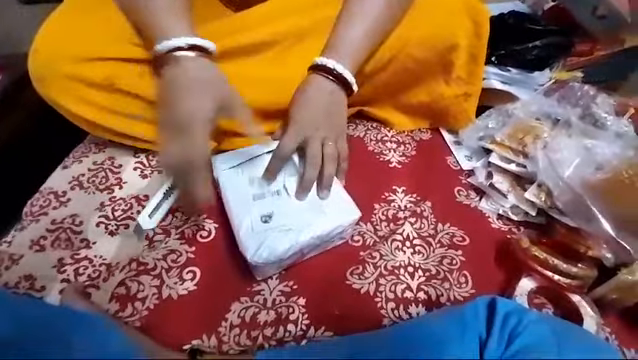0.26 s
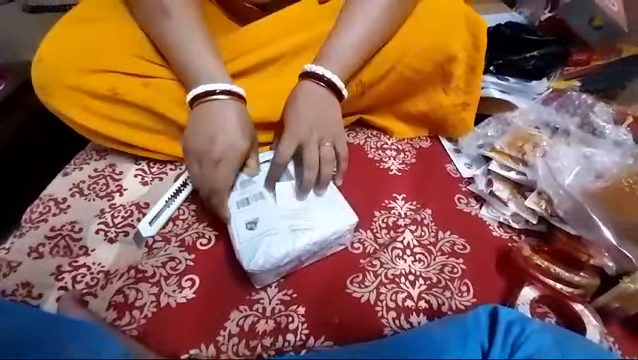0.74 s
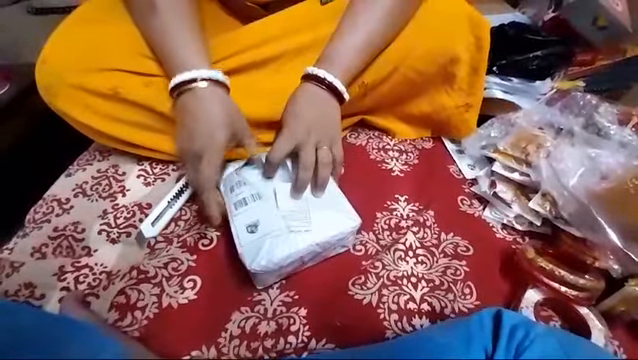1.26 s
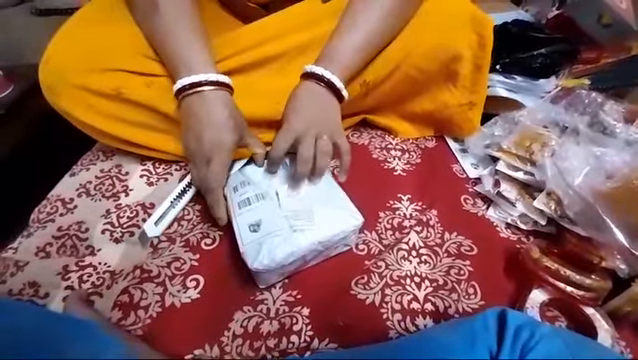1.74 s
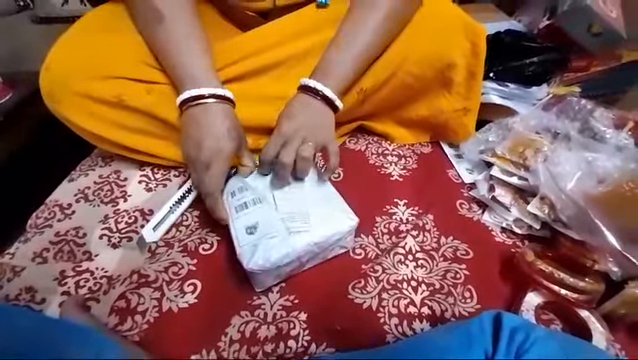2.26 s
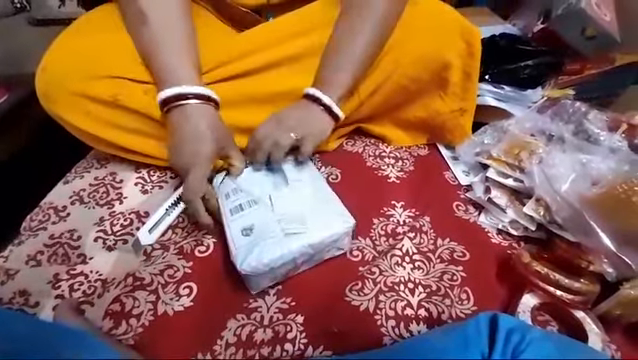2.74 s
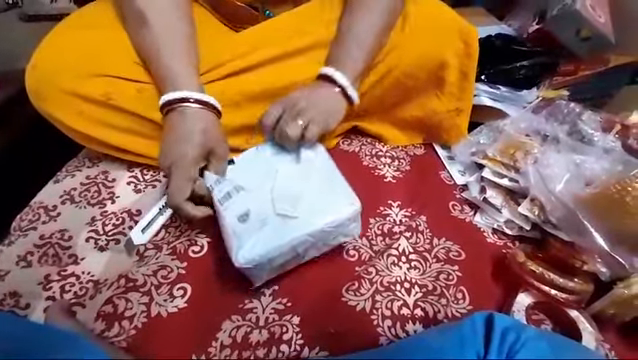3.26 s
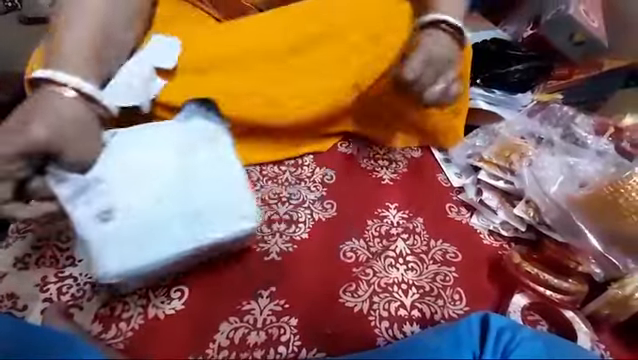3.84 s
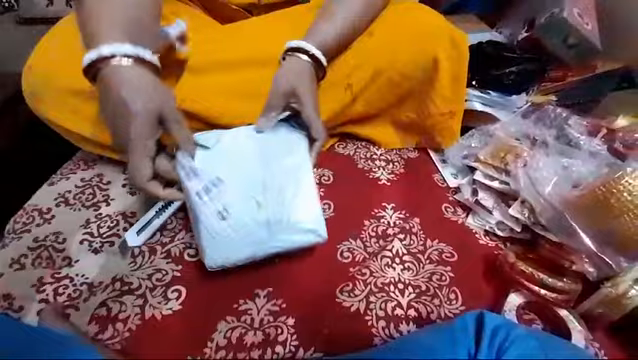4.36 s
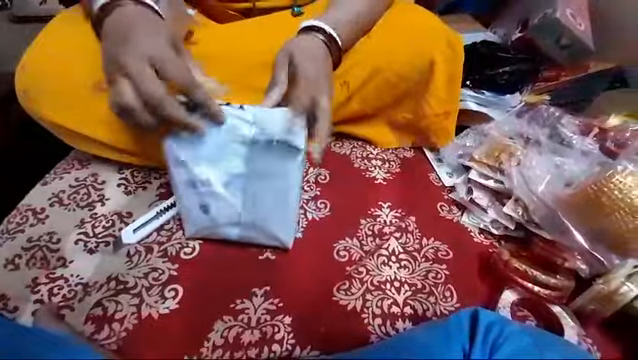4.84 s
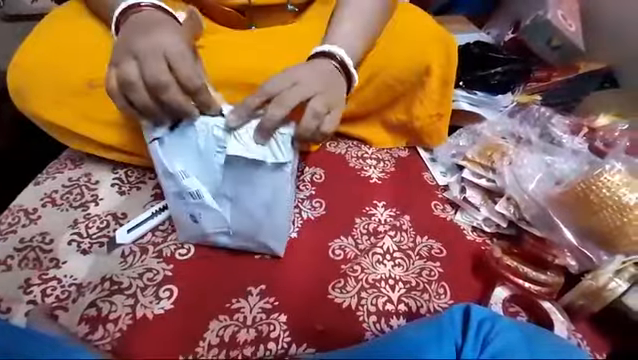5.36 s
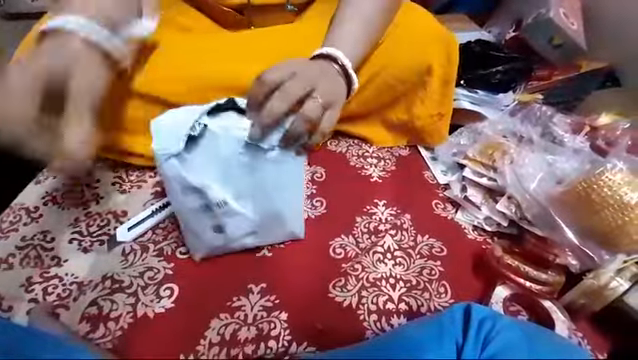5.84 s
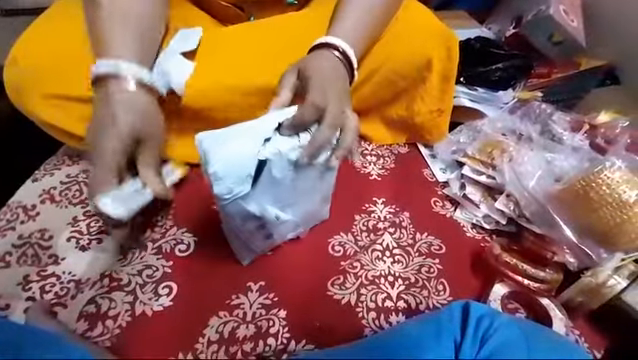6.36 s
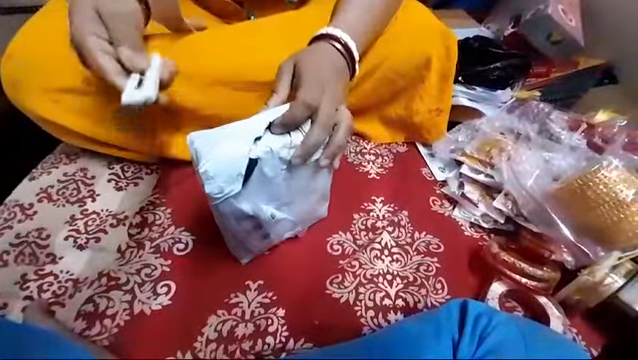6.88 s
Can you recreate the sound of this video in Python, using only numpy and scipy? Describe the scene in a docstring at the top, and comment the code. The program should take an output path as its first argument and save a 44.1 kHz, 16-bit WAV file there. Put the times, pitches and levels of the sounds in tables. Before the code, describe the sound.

Hands crinkle, snap and tear open a plastic mailer around a small box, while an engine throbs low outside the room.

```python
"""An engine outside throbs in a room with faint noise: beating orders of its cycle through broad resonances.
Hands then tear open and crumple a plastic mailer around a cardboard box, heard in stereo.
The film rustles, snaps and squeaks: noise puffs and ticks ring its patches, all coloured by one sheet.
Tugs boom in the box as short, sagging sines; faint tones are narrow noise; the seam rips in dense slips."""
import sys
import numpy as np
from scipy import signal
from scipy.fft import rfft, irfft
from scipy.io import wavfile
from scipy.ndimage import uniform_filter1d

SR = 44100
rng = np.random.default_rng(int(sys.argv[2]) if len(sys.argv) > 2 else 0)


def digitize_waveform(pressure):
    """Quantize a signal to 16-bit integers and store it at the path in sys.argv[1].

    Rows of a 2-D input are taken as channels; values are limited to [-1, 1].
    """
    field = np.atleast_2d(pressure).T
    bounded = np.clip(field, -1, 1)
    quanta = np.round(bounded * 32767).astype(np.int16)
    wavfile.write(sys.argv[1], SR, quanta)


N = 313551


def amp(db):
    """Decibels to gain."""
    return 10 ** (np.asarray(db) / 20)


def evened(x):
    """Scales to rms 1."""
    return x / np.sqrt(np.mean(x ** 2) + 1e-20)


def read(points, hz):
    """Reads a table over log frequency."""
    f, value = np.transpose(points)
    return np.interp(np.log(hz + 1), np.log(f + 1), value)


def curves(rows):
    """Columns of a time table, one value a sample."""
    s, *columns = np.transpose(rows)
    t = np.arange(N) / SR
    return [np.interp(t, s, column) for column in columns]


def colour(x, points):
    """Causal minimum-phase filter of unit energy with the given spectrum shape."""
    shape_db = np.maximum(read(points, np.fft.rfftfreq(4096, 1 / SR)), -70)
    half = shape_db * np.log(10) / 20
    log_gain = np.concatenate([half, half[-2:0:-1]])
    taps = np.fft.ifft(np.exp(np.conj(signal.hilbert(log_gain)))).real[:2048]
    taps /= np.linalg.norm(taps)
    return signal.oaconvolve(x, taps[None], axes=1)[:, :N]


def resonate(x, hz, width_hz):
    """Shifts the curve hz down to zero, smooths, and shifts back: a resonance of gain 1."""
    turn = np.exp(2j * np.pi * np.cumsum(hz * np.ones(len(x))) / SR)
    r = np.exp(-np.pi * width_hz / SR)
    smooth = signal.lfilter([1 - r], [1, -r], x / turn)
    return 2 * (turn * smooth).real


def blend(left, other, same):
    """Left and right of a given likeness, from two unrelated noises."""
    same = np.clip(same, 0, 1)
    return np.array([left, same * left + np.sqrt(1 - same ** 2) * other])


def pair(same):
    """Two channels of white noise with a given likeness."""
    left, other = rng.standard_normal((2, N))
    return blend(left, other, same)


def dying(clicks, t60_s):
    """Each click becomes an exponentially dying envelope."""
    return signal.lfilter([1], [1, -10 ** (-3 / (t60_s * SR))], clicks)


def add(mix, s, sound):
    """Mixes a sound in at a time."""
    part = mix[..., round(s * SR):][..., :sound.shape[-1]]
    part += sound[..., :part.shape[-1]]


# engine speed: (time [s], cycle rate [Hz])
CYCLE_RATE = [(0, 10.3), (1.5, 11.2), (2.3, 9.35), (4.5, 9.1), (5.7, 11), (7.11, 9.15)]
# centre of the boom resonance: (time [s], frequency [Hz])
BOOM_CENTRE = [(0, 122.6), (3.7, 122.6), (4.1, 107.9), (4.7, 112), (5.2, 118.1), (5.9, 124.2),
               (7.11, 117.5)]
# engine in the room: (time [s], boom level [dB], rumble level [dB], upper noise level [dB])
ENGINE_LEVELS = [(0.0, -33.5, -44, -51.5), (0.38, -32.5, -44, -47), (1.05, -36.5, -37.5, -38),
                 (1.35, -35.5, -37, -49.5), (1.62, -41.5, -50, -58.5), (2.15, -32, -44, -42),
                 (2.65, -38.5, -40, -54), (3.62, -31, -45.5, -46), (3.88, -37.5, -45.5, -57),
                 (4.67, -34.5, -46, -58), (5.17, -30.5, -39, -43), (5.41, -34, -34.5, -44),
                 (5.95, -38.5, -44, -55), (6.73, -40, -41.5, -55), (7.11, -31.5, -47, -53)]
# boom resonance: (frequency over centre [ratio], relative level [dB])
BOOM_SHAPE = [(.75, -49), (.86, -0.5), (.93, -2.5), (1.0, 9.5), (1.08, 1), (1.22, -67)]
# low-order resonances: (frequency [Hz], relative level [dB])
RUMBLE_SHAPE = [(30, -57), (46, 1.5), (58, -2), (76, 0.5), (88, -29), (110, -12)]


def hum():
    """The orders of a slow engine cycle pass broad resonances; neighbours beat at the cycle rate."""
    (cycle_hz,), (centre_hz,) = curves(CYCLE_RATE), curves(BOOM_CENTRE)
    boom_db, rumble_db, upper_db = curves(ENGINE_LEVELS)
    phase = 2 * np.pi * np.cumsum(cycle_hz) / SR
    boom, rumble, power = np.zeros((3, N))
    for k in range(3, 17):
        order = np.sqrt(2) * np.sin(k * phase + 2 * np.pi * rng.random())
        drift = uniform_filter1d(uniform_filter1d(rng.standard_normal(N), 9000), 9000)
        uneven = amp(3.1 * evened(drift))
        gain = uneven * amp(np.interp(k * cycle_hz / centre_hz, *np.transpose(BOOM_SHAPE)))
        boom += gain * order
        power += gain ** 2
        rumble += uneven * amp(read(RUMBLE_SHAPE, k * cycle_hz)) * order
    boom_noise, upper_noise, side_noise = rng.standard_normal((3, N))
    rough = evened(resonate(resonate(boom_noise, centre_hz, 9.8), centre_hz, 12.7))
    boom = boom / np.sqrt(power) + amp(-6.0) * rough
    upper = evened(resonate(resonate(upper_noise, 221.0, 44), 166, 510))
    mono = amp(boom_db) * boom + amp(rumble_db) * evened(rumble) + amp(upper_db) * upper
    # opposite sign left and right
    apart = amp(boom_db - 33.0) * evened(resonate(resonate(side_noise, 91, 70), 91, 70))
    return mono * amp([[-.4], [.4]]) + np.outer([1, -1], apart)


# room noise spectrum: (frequency [Hz], relative density [dB per Hz])
AIR_SPECTRUM = [(88, -13), (150, -2.5), (222, -9), (309, -10), (578, -14.5), (649, -11.5), (979, -22),
                (3770, -31), (5150, -36), (16000, -38.5)]
# room noise width: (frequency [Hz], left-right likeness [0..1])
AIR_LIKENESS = [(130, 0), (290, 1), (640, 0.24), (1400, 0)]
AIR_DB = -52  # rms


def air():
    """Room noise: most alike left and right in the low range, unrelated in the treble."""
    left, other = rfft(rng.standard_normal((2, N)))
    hz = np.fft.rfftfreq(N, 1 / SR)
    both = blend(left, other, read(AIR_LIKENESS, hz)) * amp(read(AIR_SPECTRUM, hz))
    return amp(AIR_DB) * evened(irfft(both, N))


# body of the folded film: (frequency [Hz], relative density [dB per Hz])
FILM_BODY = [(410, 7.5), (700, -4), (947, -3), (1160, -4.5), (1400, -2.5), (2100, 1.5), (3500, -4.5),
             (4400, -7.5), (8200, -9), (12100, -120)]
# small creases: (frequency [Hz], relative density [dB per Hz])
FILM_FIZZ = [(2060, -11), (3500, -10), (5600, -3), (8150, 3.5), (9200, -3), (12300, 1.5), (15100, -1.5),
             (16000, -9.5)]


def film():
    """Rustle, creases, snaps and squeaks all sound through the same film."""
    work_db = handling_db() + slides_db()
    loud, wake = snaps()
    body, fizz = rustle(work_db, wake) + creases(work_db) + loud
    body += squeaks()
    return colour(body, FILM_BODY) + colour(fizz, FILM_FIZZ)


# how hard the hands work the film: (time [s], drive level [dB])
HANDLING = [(0.0, -49), (0.38, -52.5), (0.79, -43), (1.23, -50.5), (1.56, -56.5), (1.78, -70), (2.3, -43.5),
            (2.39, -48.5), (3.55, -39), (3.64, -36.5), (3.88, -55.5), (3.97, -69), (4.06, -59.5),
            (4.34, -52), (4.77, -52), (5.01, -43.5), (5.2, -44.5), (5.29, -52.5), (5.64, -43.5),
            (6.38, -65), (6.5, -66.5), (7.11, -65.5)]


def handling_db():
    """Drive of the rustle and creases by the hands."""
    return curves(HANDLING)[0]


TREBLE_DB = -0.5  # treble offset of rustle and creases
WAKE_T60_S = 0.08


def rustle(work_db, wake):
    """Sliding hiss and ticking patches follow the hands; each snap leaves them rustling."""
    rustle_db = 20 * np.log10(amp(work_db) + dying(wake, WAKE_T60_S))
    body_flutter_db, fizz_flutter_db = 3.5 * evened(uniform_filter1d(rng.standard_normal((2, N)), 500))
    body = amp(rustle_db - 7 + body_flutter_db) * pair(0.56)
    body += amp(rustle_db - 6.5) * patches()
    fizz_db = (rustle_db + work_db) / 2 + TREBLE_DB - 5.0 + fizz_flutter_db
    return np.array([body, amp(fizz_db) * pair(0.045)])


def patches():
    """Patches of film of different pitch each tick by fits and starts; every tick rings its patch."""
    out = np.zeros((2, N))
    for hz in np.geomspace(1100, 3400, num=8):
        drift = uniform_filter1d(uniform_filter1d(rng.standard_normal(N), 500), 500)
        fits = amp(5 * evened(drift))
        sizes = amp(3.5 * np.minimum(rng.exponential(1, N), 4))
        ticks = fits * sizes * (rng.random(N) < 260 / SR)  # mean 260 ticks a second
        out += np.array([resonate(ticks * side, hz, 0.19 * hz) for side in pair(0.45)])
    return evened(out)


def creases(work_db):
    """One fold sets off its neighbours: small buckles in bunches, many small and few large."""
    sheet = np.zeros((2, 2, N))  # body and fizz, each left and right
    bunches = N * rng.random(500)
    for when, later, size, dull, side, pitch, length, lag in rng.random((1100, 8)):
        start = bunches[int(when * len(bunches))]
        at = int(min(start + .03 * SR * later, N - 1))
        db = work_db[at] + 13 - 4 * np.log(size + 0.04)
        treble_db, pan_db = TREBLE_DB - 28 * dull, 8 * (side - .5)
        hz, length_s = 1100 * 3.2 ** pitch, 0.00015 + 0.0015 * length ** 2
        add(sheet, at / SR, snap(db, treble_db, pan_db, hz, length_s, int(18 * lag - 9), 0))
    return sheet


RING = 0.33  # ring width over patch pitch


def snap(db, treble_db, pan_db, hz, length_s, lag, crack):
    """A patch buckles: a short puff rings it and the creases fizz; lag [samples] delays the right side."""
    t = np.arange(900) / SR
    flutter = amp(-18 - 60 * t / 0.03) * (1 - np.exp(-t / 0.00061))
    lengths_s = (length_s, 1.13 * length_s)  # body, fizz
    shape = np.array([(t / x) * np.exp(1 - t / x) + flutter for x in lengths_s])[:, None]
    near, far, hiss, other = rng.standard_normal((4, len(t)))
    near[10] += crack  # one hard click within the puff
    body = [near, 0.66 * near + 0.36 * far]
    fizz = [hiss, 0.5 * near + other]
    puffs = shape * np.array([body, fizz])
    direct = min(amp(treble_db + 4), .6)
    puffs[0] = [direct * p + resonate(resonate(p, hz, RING * hz), hz, hz) for p in puffs[0]]
    puffs /= np.linalg.norm(puffs, axis=2, keepdims=True)  # unit energy per band and side
    puffs[1] *= amp(treble_db + 12.0)
    left = np.pad(puffs[:, 0], [(0, 0), (10, 10)])
    right = np.pad(puffs[:, 1], [(0, 0), (10 + lag, 10 - lag)])
    return np.stack([left, right], 1) * amp(db + pan_db * np.array([[.5], [-.5]]))


# loud snaps: (time [s], level [dB], treble share [dB], patch pitch [Hz], left minus right [dB])
SNAPS = [(0.1255, -26, -13.5, 2030, 0.5), (0.4016, -18.5, -50, 1610, 11), (0.6043, -26.5, -4.5, 2360, -3.5),
         (0.8281, -30, 0.5, 1490, -3.5), (0.8998, -24.5, -14, 1750, -1.5), (0.982, -23, -7, 2430, -4.5),
         (1.044, -22, -34, 1170, 0), (1.1629, -17, -10.5, 2310, -3), (1.2487, -20.5, -14, 1820, -3),
         (1.2965, -27, -5, 1810, 0), (1.5217, -35, -5, 2150, -4), (1.5439, -32.5, 6, 1850, -2.5),
         (1.573, -22.5, -7, 1450, -2.5), (1.7657, -33.5, -3, 1860, -5), (1.9208, -34.5, -4, 2150, -2.5),
         (1.944, -33, -7, 2150, -1.5), (1.9603, -22, -13, 2370, -3), (1.9943, -23.5, -18, 1300, -0.5),
         (2.03, -26, -20, 1750, -0.5), (2.097, -20, -20.5, 1260, -2.5), (2.188, -21.5, -13, 1900, -2),
         (2.208, -36, 1, 1460, 0), (2.2846, -27.5, 7, 2250, -1.5), (2.391, -23, -8, 1750, 1.5),
         (2.4057, -24, -1, 2470, -1), (2.4334, -6, -15.5, 2300, 1), (2.4907, -18, -7, 1800, -2.5),
         (2.5914, -25, -30, 1890, 0), (2.78, -23, -21, 1700, 0), (2.882, -11.5, -5, 1940, -1),
         (2.9155, -14, -3.5, 1800, 1), (2.916, -24, -22, 1470, 0), (3.045, -44, -11, 2000, 3),
         (3.055, -12, -11.5, 1640, 0.5), (3.0762, -29, 3, 1960, 0.5), (3.1485, -8.5, -8.5, 1990, -1.5),
         (3.2238, -15.5, -14, 1630, -2), (3.2274, -18.5, -9, 2020, -2), (3.252, -10, -17, 1730, -2),
         (3.2904, -9.5, -6.5, 2230, 0.5), (3.338, -14.5, -31, 1560, -0.5), (3.37, -24, 1, 2400, -4),
         (3.3728, -14, -23, 2130, -3), (3.4008, -10.5, -11, 2210, 1), (3.537, -13.5, -9.5, 1910, -1.5),
         (3.5867, -11.5, -14, 1050, 2.5), (3.6156, -4, -19.5, 1160, 0.5), (3.661, -16, -13, 3520, 9),
         (3.6658, -32.5, 13.5, 2280, 0.5), (3.7056, -3.5, -17.5, 2740, 9.5), (3.7262, -15, -18, 2180, 5),
         (3.7389, -6.5, -13, 1070, 9), (3.829, -27, 1, 2860, 2.5), (3.897, -36, -4, 1700, 0.5),
         (4.0436, -35.5, -17, 1430, 4), (4.141, -19, -17, 1950, 3.5), (4.278, -30.5, -11, 3220, 1),
         (4.45, -25, -6.5, 1590, -1.5), (4.523, -22, -11.5, 1700, 3), (4.5655, -28, -16, 1790, -0.5),
         (4.583, -36, -14, 3400, -11), (4.6136, -34, -17, 3260, 26), (4.8266, -27.5, -19, 1930, 1.5),
         (5.0569, -37, 5, 2010, 2), (5.075, -21.5, 0, 1650, -1), (5.1098, -30, -11, 2030, -1),
         (5.1329, -20, -17, 1780, 0.5), (5.225, -26, -34, 1680, -2), (5.4024, -17.5, -12, 2170, -1.5),
         (5.4266, -30, 3, 2500, -1), (5.472, -30, -19, 1780, -5), (5.4814, -24, -19, 1820, 1.5),
         (5.6835, -27, -14, 1910, -1.5), (5.737, -23, -17, 1630, -2), (5.7679, -25, -1.5, 1710, -3),
         (5.896, -32, -19, 2360, -3), (5.9403, -23, -13, 2610, 3), (5.9875, -26, -12.5, 2840, 1),
         (6.0442, -28, -13, 1900, 1), (6.076, -38, -25, 3300, 2), (6.118, -47, -14, 2500, -4),
         (6.1309, -27, -13.5, 3420, -5.5), (6.143, -27, -29, 2740, 0), (6.343, -34, -13, 2200, -3),
         (6.4007, -23.5, -19.5, 1780, -1.5), (6.4966, -31, -11, 2600, -19)]
LAG_PER_DB = 2  # samples per dB of side: the louder side lags, up to 9
CRACK = 4  # click height over the puff's noise
WAKE_DB = -18  # rustle after a snap, re table level


def snaps():
    """Loud buckles of the film, and the clicks that start their rustling wakes."""
    sheet, wake = np.zeros((2, 2, N)), np.zeros(N)
    for s, db, treble_db, hz, pan_db in SNAPS:
        lag = int(np.clip(-LAG_PER_DB * pan_db, -9, 9))
        add(sheet, s + .0003, snap(db + 7, treble_db, pan_db, hz, 0.00042, lag, CRACK))
        wake[round(s * SR)] = amp(db + WAKE_DB)
    return sheet, wake


# fingers slide over the film: (start [s], length [s], swell [dB])
SLIDES = [(0.579, 0.17, 8.5), (0.955, 0.098, 5.5), (1.15, 0.27, 6), (1.696, 0.21, 14), (4.177, 0.18, 7.5),
          (4.693, 0.11, 5.5), (5.285, 0.2, 8), (6.164, 0.36, 11.5), (6.855, 0.046, 12), (7.03, 0.3, 13.5)]
SLIDE_EDGE = 0.42  # share of a slide spent swelling and fading


def slides_db():
    """Each slide swells the film's drive, holds and fades."""
    out = np.zeros(N)
    for start, length_s, db in SLIDES:
        add(out, start, db * signal.windows.tukey(round(length_s * SR), SLIDE_EDGE))
    return out


# tugs on the box: (time [s], level [dB], settled pitch [Hz], t60 [s])
BOOMS = [(0.955, -14.5, 320, 0.03), (0.982, -21, 269, 0.047), (1.259, -26, 253, 0.016),
         (1.972, -24.5, 231, 0.01), (2.338, -23, 289, 0.025), (2.431, -15, 354, 0.017),
         (2.896, -21.5, 287, 0.041), (3.052, -27, 266, 0.027), (3.151, -33, 338, 0.027),
         (3.251, -14, 526, 0.021), (3.402, -25, 338, 0.02), (3.589, -24, 242, 0.12),
         (3.7259, -10, 313, 0.026), (3.74, -19, 244, 0.056)]


def box():
    """A tug rings the hollow box for a few cycles, the pitch sagging, with a rougher wake."""
    out, wake, t = np.zeros(N), np.zeros(N), np.arange(5000) / SR
    for s, db, hz, t60_s in BOOMS:
        cycles = hz * (t + 0.00097 * (1 - np.exp(-t / 0.004)))
        decay = amp(db + 6.5 - 60 * t / max(t60_s, .008))
        attack = 1 - np.exp(-t / 0.0015)
        add(out, s, decay * attack * np.sin(2 * np.pi * cycles))
        wake[round(s * SR)] = amp(db - 8)
    # (frequency [Hz], relative density [dB per Hz])
    rough_spectrum = [(150, -31.0), (240, -0.5), (500, 0.0), (800, -23), (1300, -17.5), (3000, -34.0)]
    rough = colour(dying(wake, 0.07) * pair(0.95), rough_spectrum)
    return out * amp([[.5], [-.5]]) + rough


# faint tones: (start [s], end [s], pitch [Hz], level [dB])
TONES = [(1.402, 1.75, 930, -62.5), (4.33, 4.51, 3440, -62), (5.12, 5.397, 685, -53)]


def tones():
    """Thin, slightly fuzzy tones from narrow noise come and go in the background."""
    out = np.zeros(N)
    for start, end, hz, db in TONES:
        noise = rng.standard_normal(round((end - start) * SR))
        tone = evened(resonate(noise, hz, 30.0))
        add(out, start, amp(db) * tone * signal.windows.tukey(len(noise), .5))
    return out


# rips along the seam: (start [s], end [s], level [dB])
RIPS = [(3.312, 3.44, -43.5), (3.583, 3.647, -30), (5.754, 5.828, -40.5)]


def rips():
    """The seam gives way in a dense, ragged run of slips that shakes film and box together."""
    push = np.zeros(N)
    for start, end, db in RIPS:
        u = np.linspace(0, 1, round((end - start) * SR))
        add(push, start, amp(db) * np.minimum(20 * u, 1) * np.sqrt(1 - u ** 2))  # fast in, slow out
    kicks = rng.exponential(1, N) * (rng.random(N) < 500 / SR)  # mean 500 a second
    slips = 1.08 + evened(dying(kicks, 0.048))
    # (frequency [Hz], relative density [dB per Hz])
    spectrum = [(150, -74), (300, 2.0), (700, -10.5), (1800, 0.0), (4000, -12.5), (16000, -15.0)]
    return colour(push * slips * pair(0.82), spectrum)


# film rubs on film: (start [s], length [s], pitch [Hz], level [dB])
SQUEAKS = [(3.386, 0.014, 2000, -34.5), (4.126, 0.043, 2020, -56)]


def squeaks():
    """Rubbing film sings briefly: noise through a resonance, the same in both channels."""
    out = np.zeros((2, N))
    for start, length_s, hz, db in SQUEAKS:
        rub = rng.standard_normal(round(length_s * SR))
        song = evened(resonate(rub, hz, RING * hz / 2))
        add(out, start, amp(db) * song * signal.windows.tukey(len(rub), .5))
    return out


def scene():
    """All sources together."""
    return hum() + air() + film() + box() + tones() + rips()


EDGE_HZ = 16200


def record(dry):
    """Linear-phase low-pass at the band edge."""
    taps = signal.firwin(511, EDGE_HZ, window=("kaiser", 9), fs=SR)
    return signal.oaconvolve(dry, taps[None], "same")


dry = scene()
out = record(dry)
digitize_waveform(out)
```